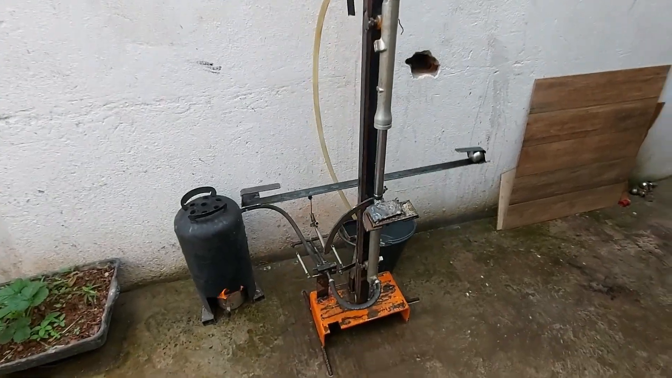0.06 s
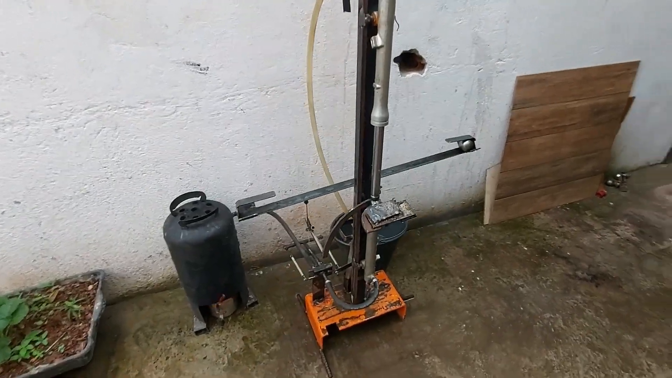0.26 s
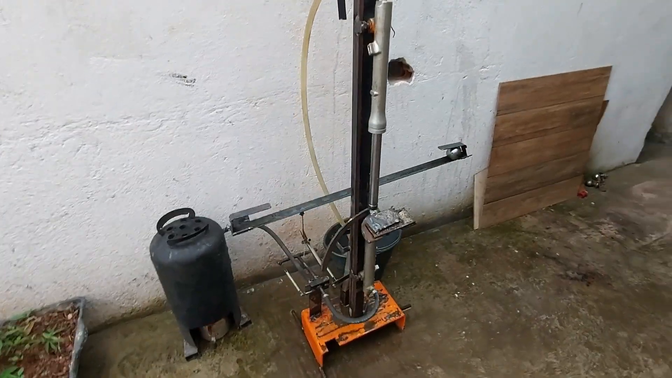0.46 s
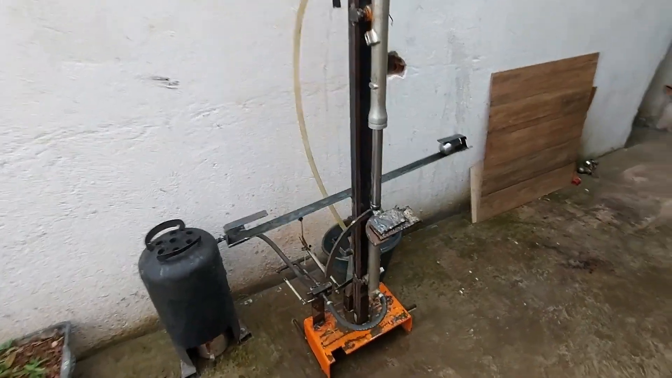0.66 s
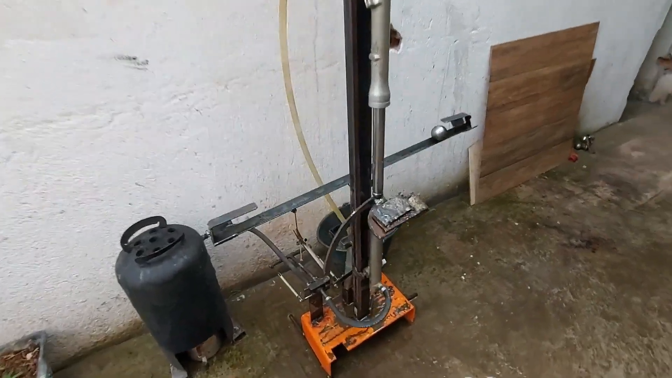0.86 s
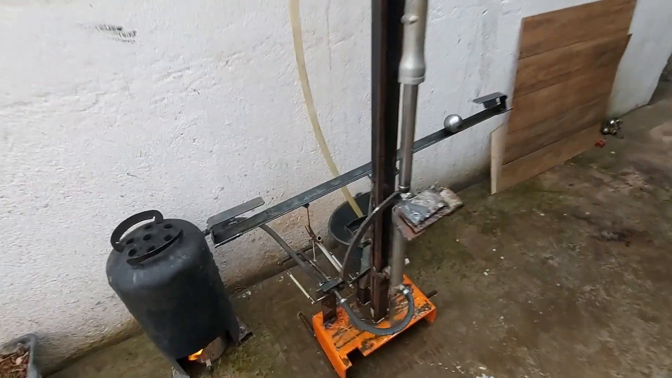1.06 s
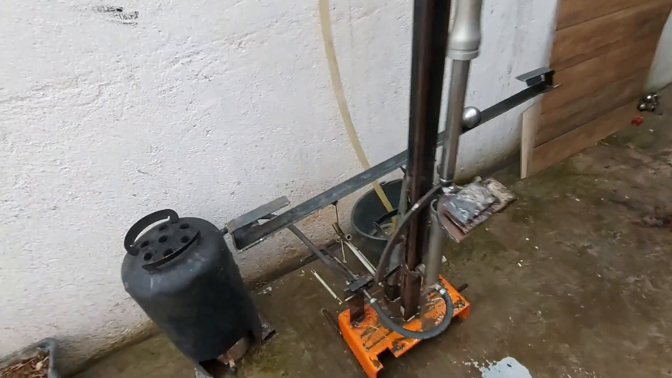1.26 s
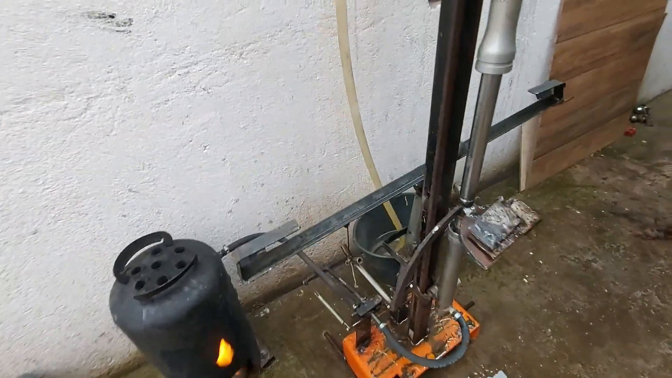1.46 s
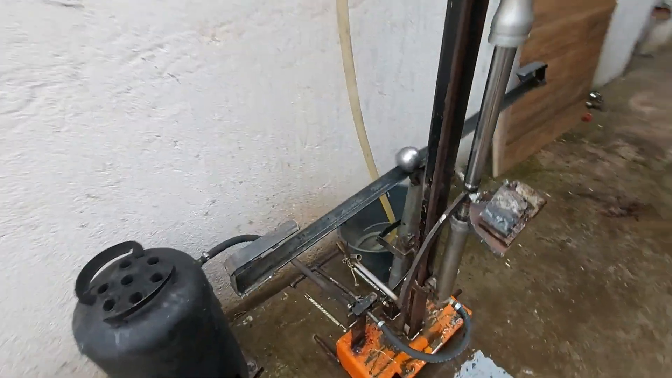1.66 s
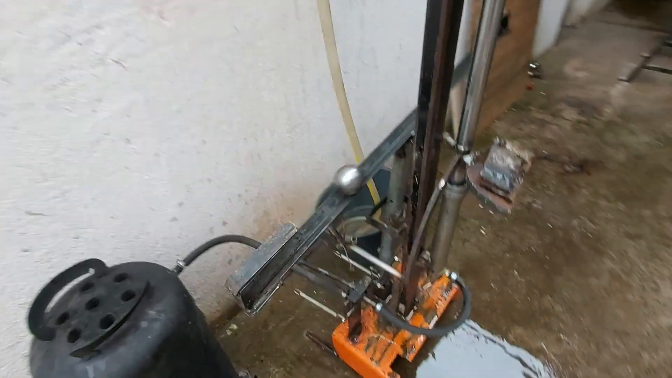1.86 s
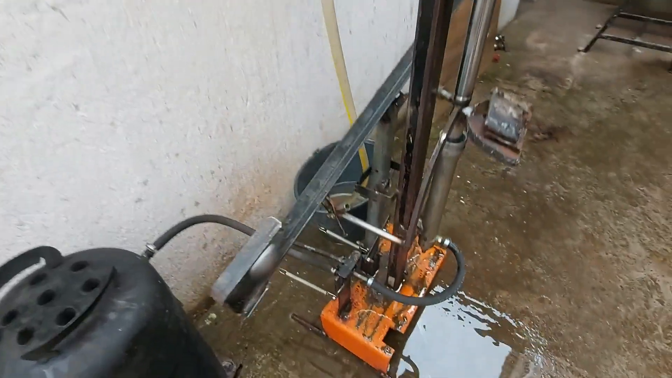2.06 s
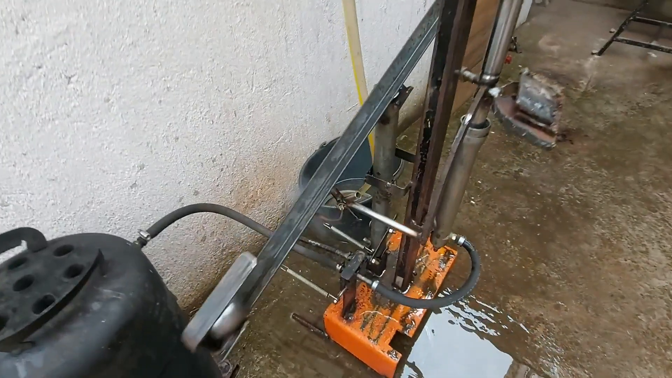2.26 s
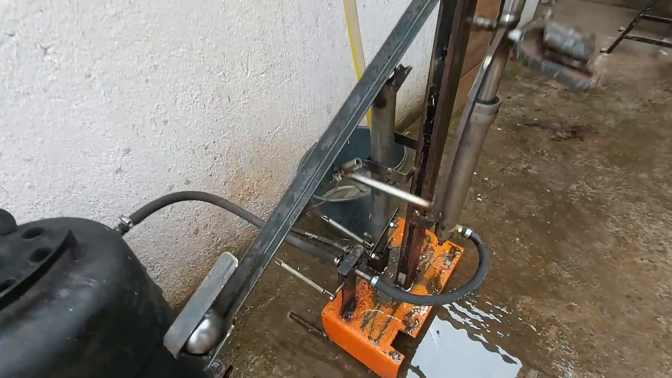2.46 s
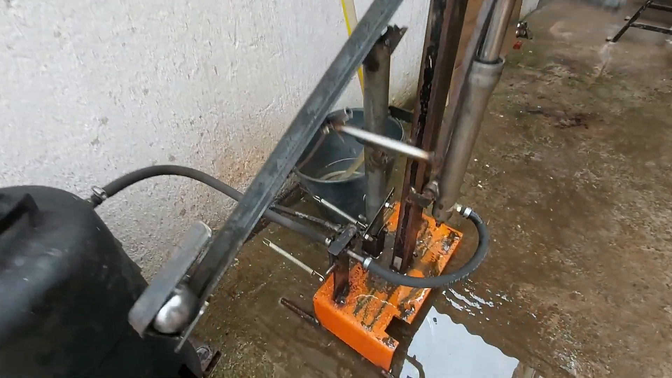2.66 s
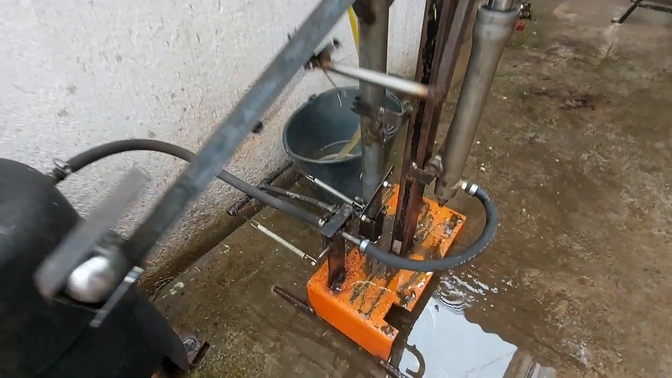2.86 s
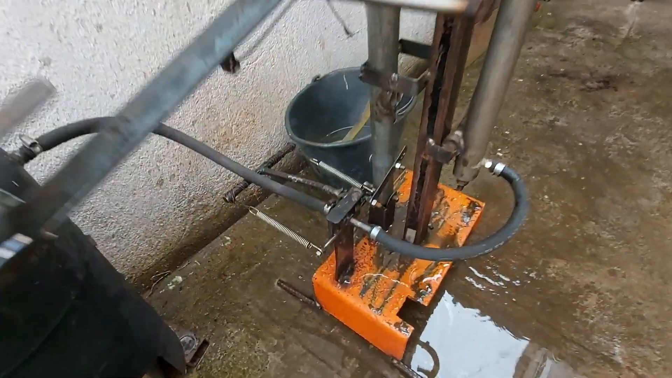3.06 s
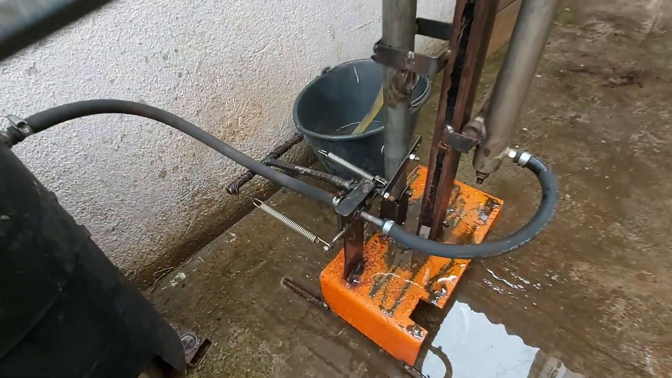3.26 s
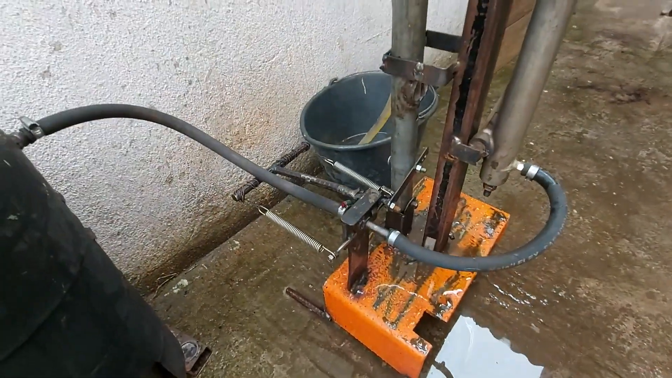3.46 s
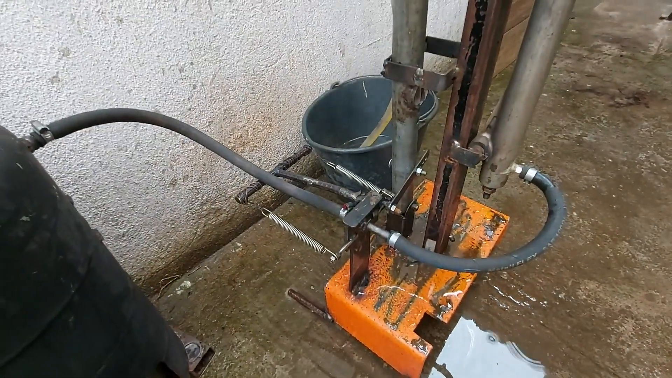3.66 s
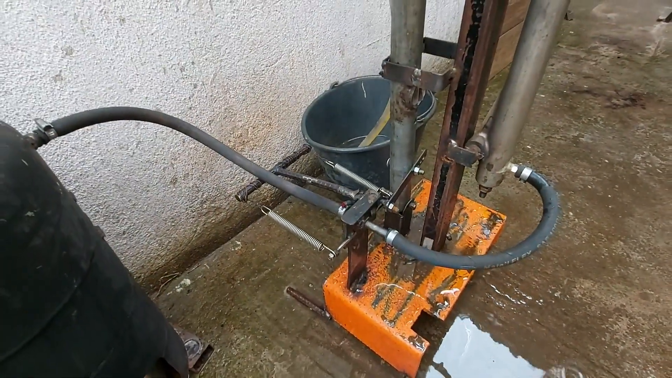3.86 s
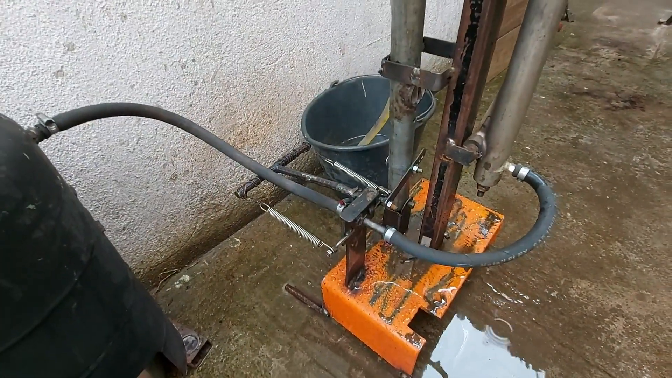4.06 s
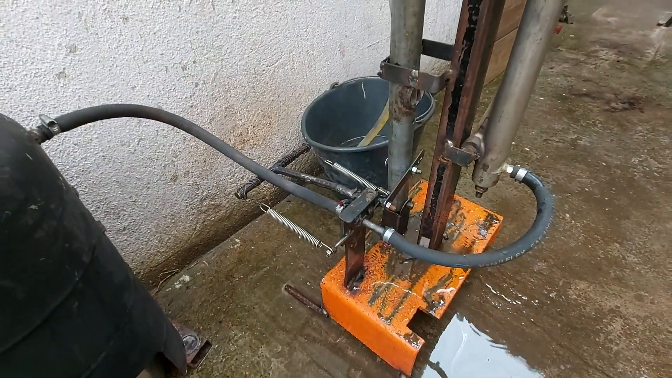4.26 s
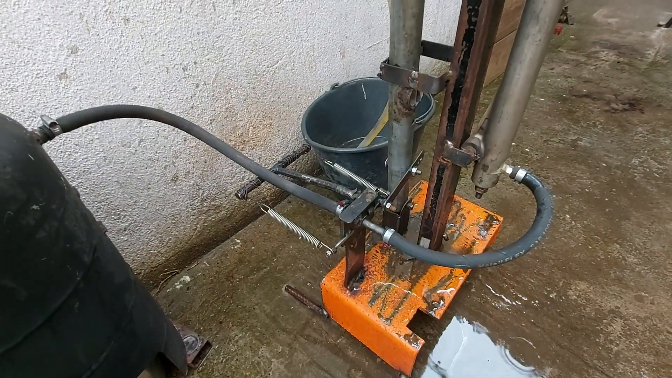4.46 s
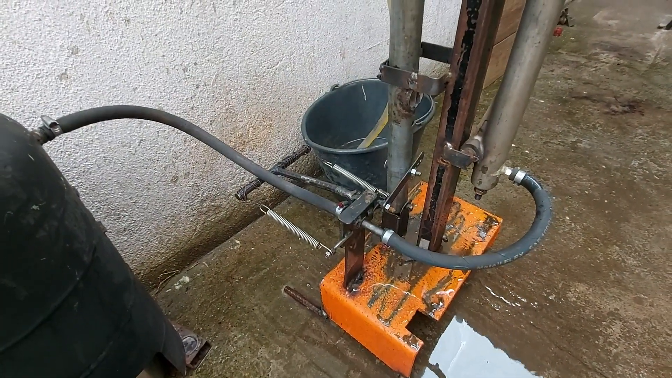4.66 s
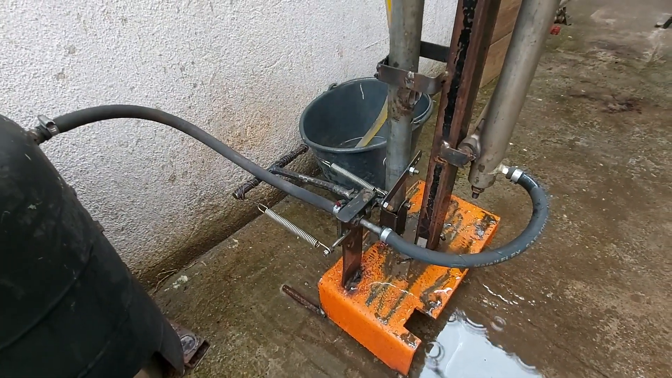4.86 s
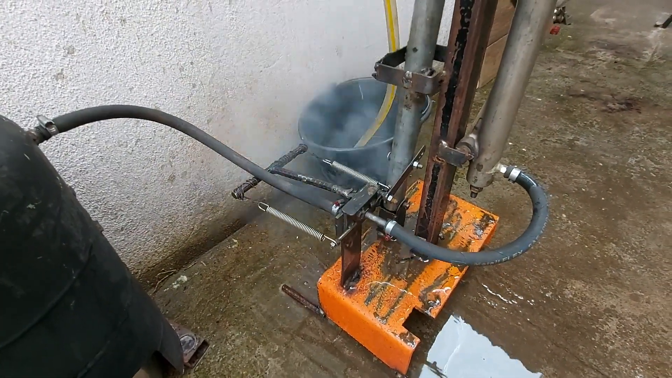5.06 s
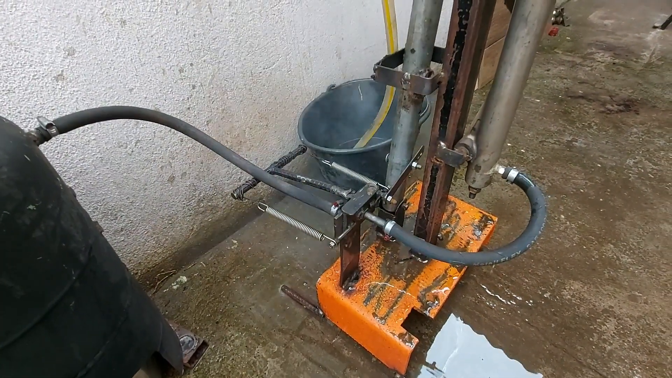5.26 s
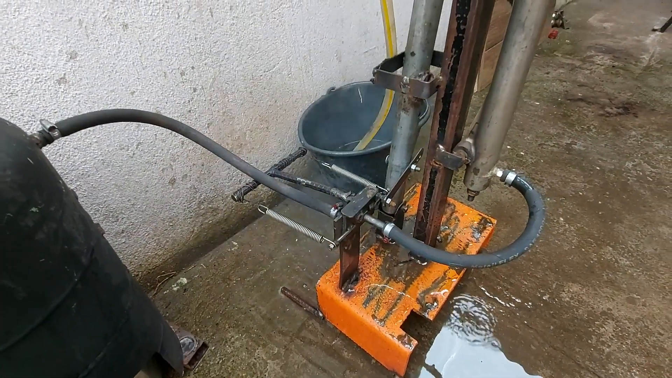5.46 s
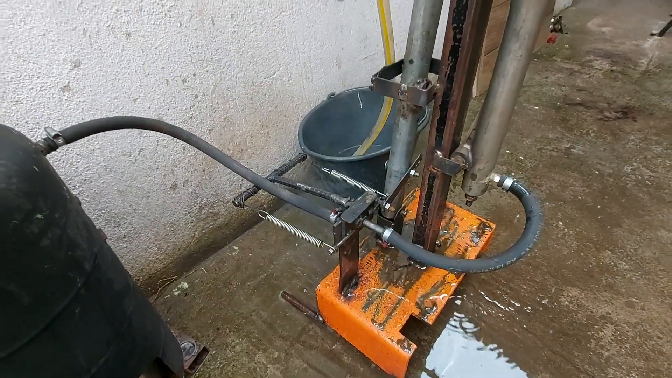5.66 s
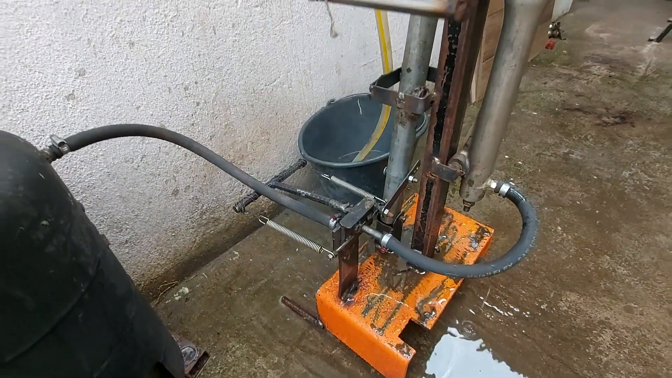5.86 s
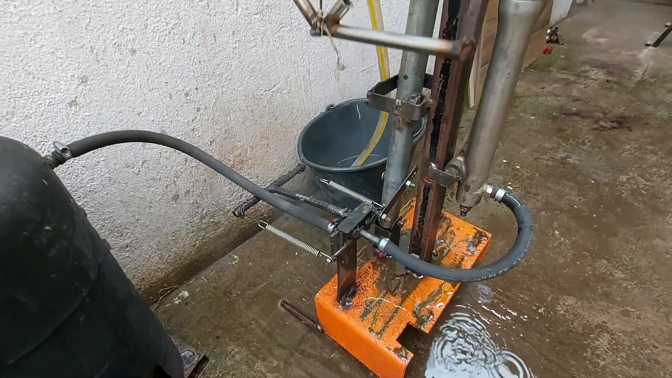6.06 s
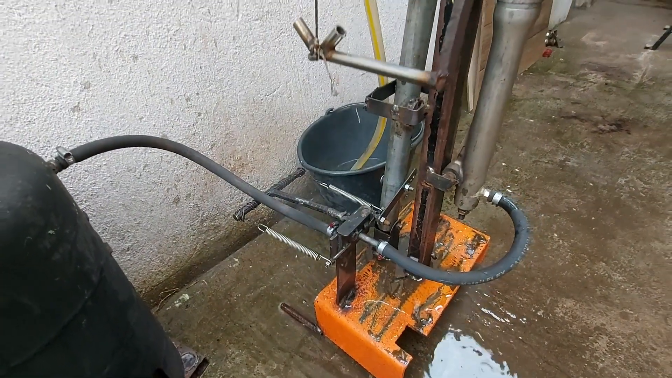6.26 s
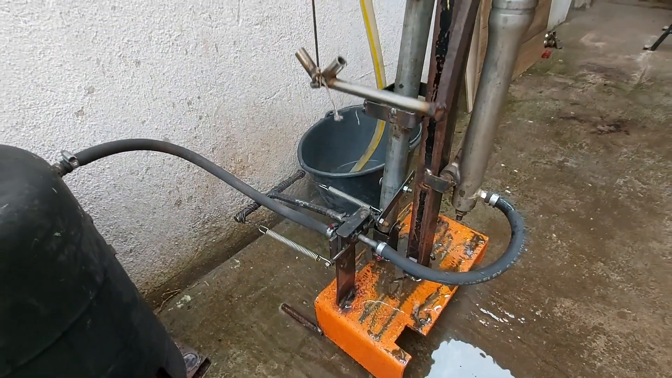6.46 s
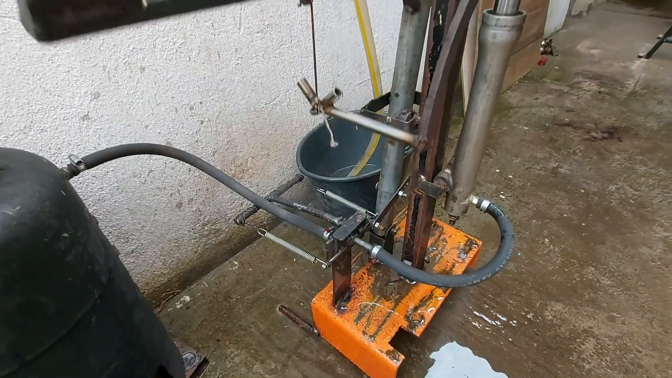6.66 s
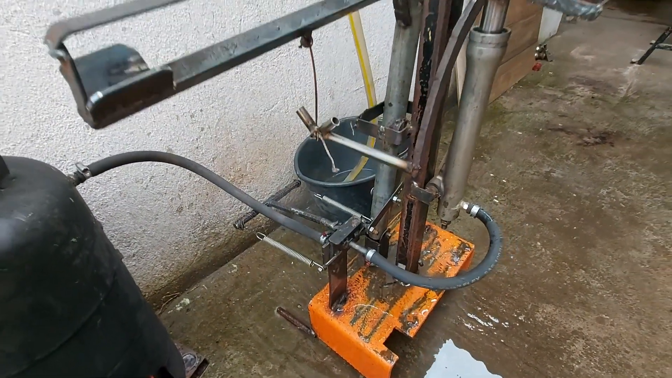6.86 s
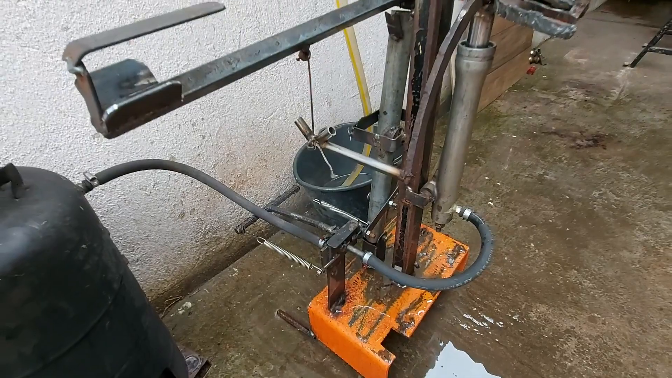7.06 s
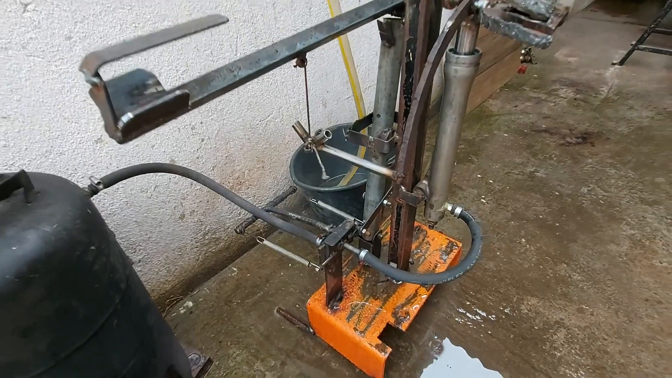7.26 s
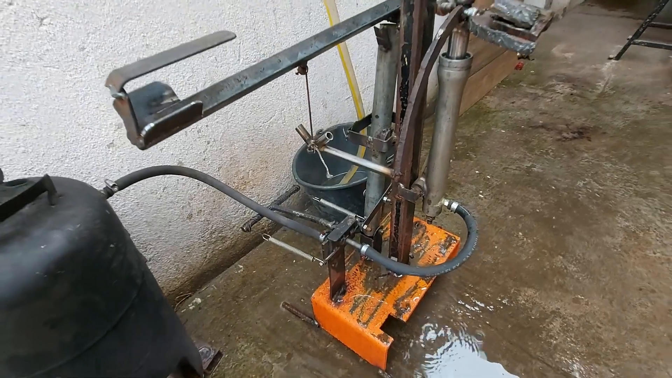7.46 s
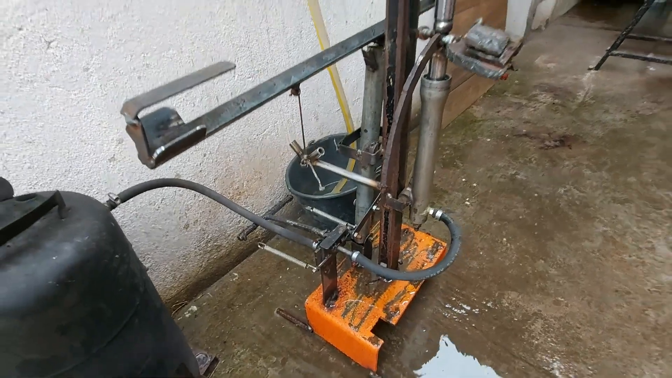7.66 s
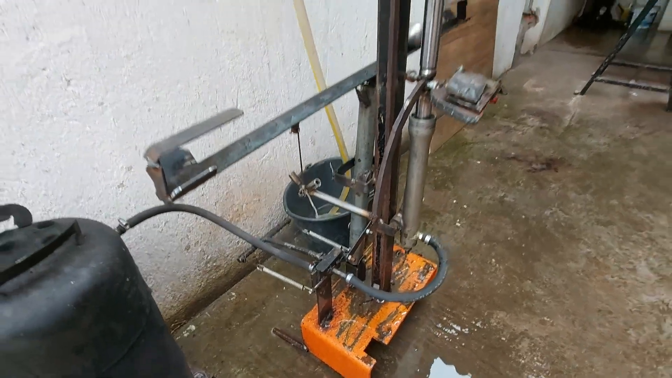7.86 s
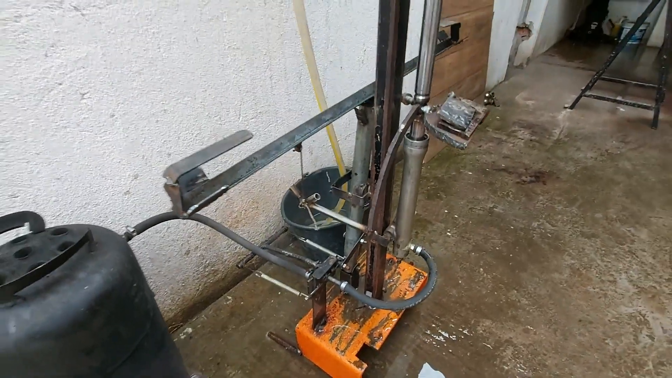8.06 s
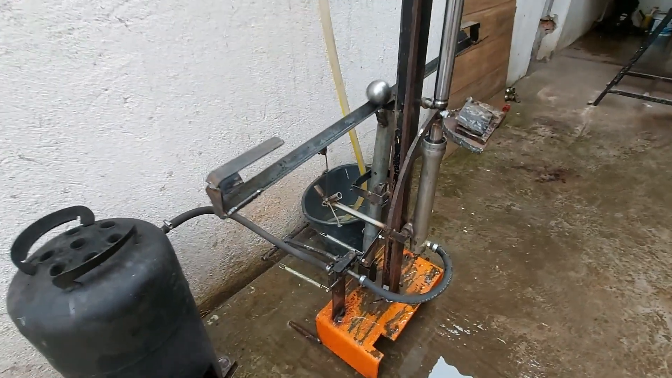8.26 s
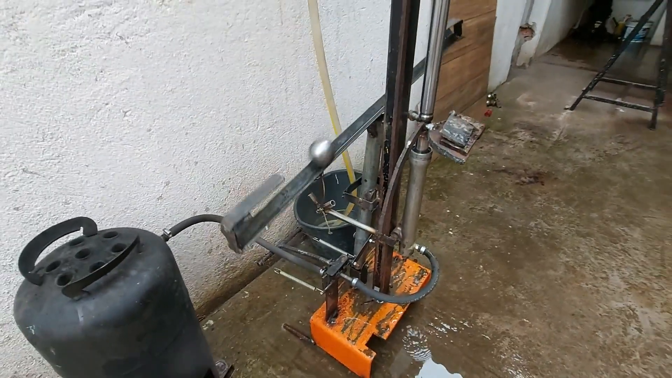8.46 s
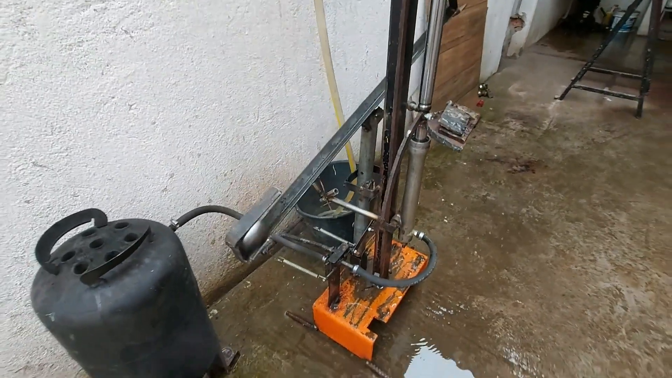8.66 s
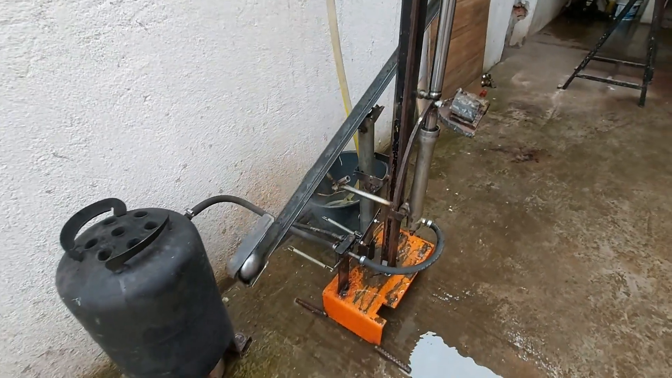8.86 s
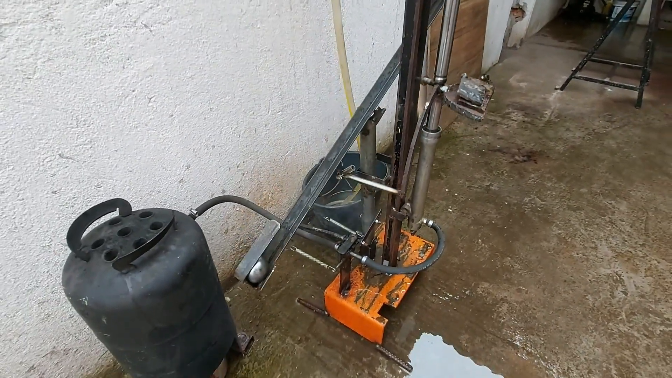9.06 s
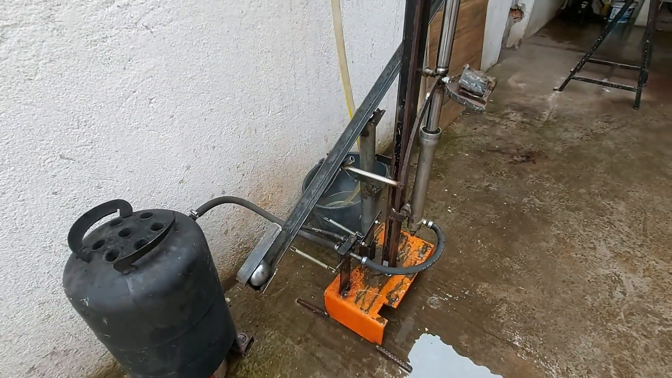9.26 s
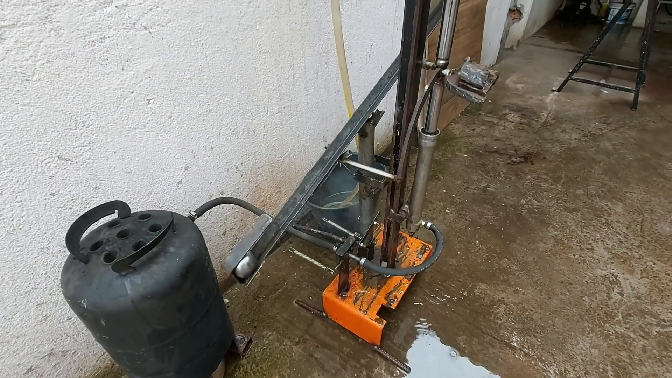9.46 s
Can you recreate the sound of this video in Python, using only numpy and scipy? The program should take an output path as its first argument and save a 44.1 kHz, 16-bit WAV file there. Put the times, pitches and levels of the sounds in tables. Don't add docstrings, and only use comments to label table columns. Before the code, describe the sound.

A steel ball rolls down a steel rail three times, knocking over joints and slamming a stop as steam hisses in bursts in a walled yard.

```python
import sys
import numpy as np
from scipy import signal
from scipy.fft import rfft, irfft, next_fast_len
from scipy.io import wavfile
from scipy.ndimage import uniform_filter1d

SR = 44100
rng = np.random.default_rng(int(sys.argv[2]) if len(sys.argv) > 2 else 0)


def elevation(decibels):
    levels = np.asarray(decibels, float)
    return 10 ** (levels / 20)


def generate_wav(signal):
    frames = np.transpose(np.atleast_2d(signal))
    scaled = np.clip(frames, -1, 1) * 32767
    pcm = np.round(scaled).astype(np.int16)
    wavfile.write(sys.argv[1], SR, pcm)


N = 419391
STEPS = np.arange(0, N + 32, 32) / SR

# frequency in Hz, density in dB per Hz.
YARD_AIR = [(85, 1), (417, -20.5), (1170, -21.5), (1930, -11.5), (4200, -14), (8450, -16.5), (9710, -14.5),
            (15600, -16.5)]
# time in seconds, level in dB, engine note in Hz.
TRAFFIC = [(0, -79.5, 90), (.7, -72.5, 94.6), (1.3, -62.5, 101.4), (2.6, -75, 101.2), (3.1, -74, 101),
           (3.35, -77, 100), (3.6, -73, 52), (4.3, -65.5, 52.4), (5.5, -81.5, 59.8), (6.2, -93, 61.7),
           (6.6, -80.5, 62.3), (7.5, -68.5, 59.7), (7.75, -60, 59.9), (9.51, -69.5, 58)]
# start in seconds, length in seconds, start in Hz, end in Hz, level in dB.
CHIRPS = [
    (5.864, .14, 4300, 3900, -71.5),
    (6.432, 0.096, 4800, 3730, -68),
    (6.511, 0.055, 3470, 4250, -66),
    (6.651, .12, 4710, 4970, -74),
    (7.178, 0.051, 4800, 4500, -56),
    (7.207, 0.065, 5100, 4600, -58),
    (7.255, 0.071, 4300, 3900, -56),
    (7.3, 0.088, 4000, 3700, -60),
]

# frequency in Hz, likeness from 0 to 1.
PORT_LIKENESS = [(60, 1), (180, 0.84), (550, 1), (1650, 0.14), (4970, 0.02), (15000, 0.018)]
# frequency in Hz, gain in dB.
PORT_COLOUR = [(6500, -0.5), (8100, -2), (8900, 2), (13000, 2.5), (15600, 1.5)]
# frequency in Hz, t60 in seconds.
WALL_T60 = [(200, 0.66), (1500, 0.87), (5000, 0.46), (14000, 0.19)]

# frequency in Hz, density in dB per Hz.
HISS = [(1760, -40.5), (3000, -3.5), (3640, -2.5), (4630, -2), (8100, -6.5), (9960, -4.5), (14600, -11.5),
        (15600, -15.5)]
# time in seconds, level in dB.
LEAK = [(0, -92), (.247, -88), (.29, -58), (.95, -67.5), (1.1, -78), (1.79, -68), (2.8, -68), (3.35, -65.5),
        (3.76, -55.5), (4.3, -46.5), (4.42, -52), (5.62, -87), (6.28, -85), (6.33, -73.5), (6.84, -65.5),
        (8.02, -76), (9.29, -70), (9.51, -60)]
# start in seconds, stop in seconds, first level in dB, last level in dB.
VENTS = [
    (2.185, 2.256, -27.5, -25),
    (6.888, 6.93, -45, -35.5),
    (8.426, 8.626, -40, -50),
    (8.737, 8.925, -25, -33.5),
    (8.958, 9.188, -27, -39),
]
# peak in seconds, level in dB, rise and fall in seconds per 20 dB.
JETS = [(1.04, -51, 0.015, 0.026), (1.81, -31.5, 0.013, .031), (1.93, -32, 0.014, 0.037),
        (2.09, -32, 0.11, 0.05), (2.168, -23.5, .012, .018), (2.52, -34, .05, 0.22),
        (5.26, -33, 0.069, 0.15), (1.32, -40, .015, 0.042), (1.392, -39, .012, 0.055),
        (1.64, -40.5, .04, 0.035), (1.718, -38.5, .025, 0.028), (1.765, -41, .015, .02),
        (4.465, -32, .03, 0.046), (2.28, -29.5, .02, 0.3), (2.43, -26, 0.028, 0.15),
        (3.2, -55.5, .04, 0.26), (4.328, -34, 0.046, 0.087), (4.538, -23.5, 0.071, 0.036),
        (4.692, -28.5, 0.24, 0.17), (4.892, -22.5, 0.048, 0.046), (5.024, -23.5, 0.1, 0.13),
        (5.164, -23, 0.094, 0.14), (6.85, -39, .003, .05), (7.42, -53.5, 0.11, 0.36),
        (7.85, -37, .005, 0.095), (8.42, -38, 0.22, 0.041), (8.635, -22, .008, 0.061)]
# start in seconds, length in seconds, level in dB.
SPITS = [(0.525, 0.06, -57), (.655, 0.083, -57), (0.785, 0.056, -55), (0.907, 0.046, -55.5),
         (2.914, 0.063, -56), (6.988, 0.078, -52.5), (7.116, 0.07, -51.5), (7.225, 0.12, -52.5),
         (7.412, 0.027, -47.5), (7.506, 0.067, -52.5), (7.606, 0.087, -54), (7.728, .08, -56.5),
         (7.942, 0.051, -42), (8.07, 0.021, -54), (4.633, 0.1, -46)]

# frequency in Hz, density in dB per Hz.
GRIND = [(71, -38.5), (120, -16), (340, -8), (1910, 2), (4240, -2.5), (8300, -11.5), (10600, -11.5),
         (15600, -25.5)]
# start in seconds, stop in seconds,
# first level in dB, last level in dB, bend of the rise (below 1 speeds up early).
RUNS = [
    (0.84, 2.264, -65.5, -35, 0.34),
    (2.392, 2.468, -41, -39, 1.01),
    (2.84, 3.15, -66, -70, 0.74),
    (3.793, 3.837, -42.5, -45, 1.01),
    (3.93, 5.248, -60, -35.5, 0.36),
    (7.053, 7.45, -65.5, -61, 1.1),
    (7.558, 8.842, -56, -36, 1.25),
    (9.295, 9.51, -69, -73, 0.95),
]
# peak in seconds, level in dB, rise and fall in seconds per 20 dB.
RATTLES = [(.31, -42, 0.047, 0.21), (.78, -58, 0.037, 0.077), (1.39, -42, 0.21, 1),
           (2.8, -59, 0.035, 0.066), (3.96, -39, 0.052, 0.049), (4.34, -37.5, 0.18, 0.066),
           (4.535, -35, .09, 0.073), (4.629, -33.5, 0.084, 0.44), (4.77, -35.5, 0.063, 0.088),
           (6.9, -41, 0.019, 0.16), (8.245, -37, 0.13, 0.055), (7.5, -39.5, 0.033, 0.065),
           (7.87, -42, 0.073, 0.97), (8.45, -38, 0.34, 0.17), (8.65, -50, 0.085, 0.037),
           (9.03, -35, 0.12, 0.15)]
# start in seconds, peak in dB, t60 in seconds.
BLOWS = [
    (.249, -31.5, 0.29),
    (.774, -44, 0.89),
    (2.053, -18, 0.14),
    (2.184, -14, .11),
    (3.782, -24.5, 0.043),
    (4.963, -12.5, 0.053),
    (6.848, -25, 0.23),
]
# start in seconds, peak in dB, t60 in seconds.
CLINKS = [(1.761, -41, .14), (1.908, -29, .14), (2.158, -16, 0.052), (2.382, -14.5, 0.58),
          (3.957, -24, 0.051), (4.871, -22, 0.16), (5.123, -17, 0.18), (6.8885, -18, 0.32),
          (8.422, -22, 0.14), (8.7325, -11, 0.041), (8.9545, -16, 0.68), (9.029, -14, 0.055)]
# start in seconds, peak in dB, t60 in seconds.
TAPS = [
    (.288, -25, 0.29),
    (2.665, -30.5, 0.05),
    (2.795, -26.5, 0.095),
    (3.829, -22.5, 0.25),
    (9.361, -29.5, 0.078),
]
# start in seconds, peak in dB.
JOINTS = [(0.924, -35.5), (1.032, -27), (1.161, -31), (1.198, -25), (1.313, -26), (1.39, -27), (1.625, -22),
          (1.713, -27), (1.801, -26.5), (5.534, -43.5), (5.66, -42.5), (7.471, -36.5), (7.639, -35),
          (7.849, -29.5), (8.119, -26), (8.346, -22), (8.632, -17)]
# start in seconds, peak in dB.
THUDS = [
    (0.252, -48),
    (2.056, -31),
    (3.782, -44.5),
    (6.848, -42),
    (8.633, -23.5),
]

STROKE_ENDS = (3.75, 6.8)
RAIL_HZ = [301, 937, 1790, 1900, 2955, 3408, 3562, 3930, 4354, 4506, 4932, 5626, 6066, 9195]
RAIL_T60 = [.1, .08, .06, .08, .08, .09, .09, .08, .1, .13, .12, .15, .14, .12]
# level in dB in strokes 1, 2 and 3.
RAIL_LEVELS = [(-0.5, -25, -6.5), (-15, -11, -12.5), (-6.5, -11, -2), (1.5, -3.5, -2), (-14, -12, -2.5),
               (-7.5, -5.5, 0), (-4, -0.5, 5), (-3, -2.5, 0.5), (0.5, -6, -5), (0, 0, -14), (0, 1, -3),
               (-14, 6.5, -4), (-4, -16, -7), (3, -5, 5)]
TOP_HZ = [3820, 5970, 6470, 7030, 8660, 9490, 9800, 9994, 10380, 11300, 11965, 12400, 12700, 14200]
# level in dB in strokes 1, 2 and 3.
TOP_LEVELS = [(-8.5, -8, -4.5), (-9, -2, -6), (-9.5, -10.5, -7), (-8.5, -5, -8), (-5, -9, -9),
              (-2.5, -3.5, -7), (-5, -9, -11), (-5, -2.5, -1.5), (-7, -5, -5), (-11, -4.5, -6),
              (-7, -8, -7), (-9, -3.5, -11), (-7, -2, -10), (-6, -7, -7)]
# start in seconds, frequency in Hz,
# level in dB, t60 in seconds.
BELLS = [(.288, 1905, -37.5, .2), (.34, 1912, -37.5, .15), (2.55, 1745, -55, .5), (4.0, 1476, -58, 1.8),
         (4.53, 1476, -47, 1.8), (5.123, 1476, -43.5, 1.8), (9.031, 380, -53, 1.1), (6.89, 383, -60, 1.1),
         (7.86, 380, -62, 2.5), (5.537, 2165, -61, .4), (2.798, 1720, -58, .6),
         (0.251, 4150, -42.5, .08), (2.162, 9140, -28.5, 0.12), (2.797, 6640, -35.5, 0.1),
         (9.363, 6730, -42, 0.078), (6.892, 1908, -40, 0.33), (6.89, 3820, -36, 0.3),
         (6.889, 5960, -36, .3), (6.89, 3900, -40, .25), (6.3, 1480, -54, .2), (3.067, 2000, -55, .05),
         (2.225, 9490, -33, .2), (8.99, 5620, -33, .12), (6.891, 5626, -32.5, 0.27),
         (6.889, 2890, -36, 0.26), (8.424, 4800, -35.5, 0.16), (8.822, 5620, -29, 0.3),
         (9.03, 5400, -30.5, 0.35), (8.957, 5600, -33, .15), (8.98, 9195, -30, .12),
         (8.735, 9900, -31, .08), (2.158, 5630, -29.5, .1), (2.385, 5700, -34.5, .2),
         (2.385, 13000, -33, .2), (2.665, 6560, -45, .15)]

# frequency in Hz, density in dB per Hz.
BUFFET = [(20, -3), (86, 0.5), (206, -8.5), (280, -2), (1160, -16.5), (1500, -17), (1950, -22.5),
          (3300, -48.5)]
# start in seconds, length in seconds, first level in dB,
# last level in dB, left-right difference in dB.
PUFFS = [
    (2.176, 0.08, -35, -28.5, -2),
    (2.38, 0.044, -23.5, -41, -4),
    (2.421, 0.096, -27, -47, -2.5),
    (4.961, 0.095, -31.5, -23, 4.5),
    (5.123, 0.014, -34, -37, 19),
    (5.15, 0.034, -29.5, -33, 13),
    (8.757, 0.0785, -30.5, -27.5, -1.5),
    (8.956, 0.049, -47, -26, 4.5),
    (9.028, 0.016, -33, -30.5, 15),
]
# start in
# seconds, peak in dB, pitch in Hz.
DRIPS = [(3.067, -37.5, 9850), (3.1009, -40, 11000), (3.1103, -32.5, 4330), (3.134, -32.5, 9900),
         (3.1775, -33, 7200), (3.1979, -30.5, 10570), (3.2873, -38.5, 10200), (3.31, -34, 9650),
         (3.419, -39.5, 10300), (3.6192, -36, 9860), (3.669, -33.5, 7500), (3.6915, -39, 10400),
         (3.7854, -30, 3330), (4.0767, -28, 10600), (4.118, -25, 9900), (4.1675, -23.5, 9700),
         (4.1944, -30, 5300), (4.962, -13, 11700), (3.152, -44, 11500), (3.2125, -40, 10500),
         (3.2435, -40, 9800), (3.2505, -44, 9900), (4.4301, -36, 9500), (4.4546, -30, 9500),
         (4.6811, -22, 9500), (8.6016, -30, 9500), (8.4136, -29, 9500)]
# delay in seconds, gain in dB.
DRIP_ECHOES = [(.0028, -5.5), (.0095, -10), (.016, -12.5)]


def evened(x):
    return x / np.sqrt(np.mean(x ** 2) + 1e-20)


def read(points, hz):
    f, value = np.transpose(points)
    return np.interp(np.log(hz + 1), np.log(f + 1), value)


def trace(rows, column, rest):
    rows, t = np.array(rows), np.arange(N) / SR
    curve = np.interp(t, rows[:, 0], rows[:, column])
    return np.where((t >= rows[0, 0]) & (t <= rows[-1, 0]), curve, rest)


def add(mix, s, sound):
    part = mix[:, round(s * SR):][:, :sound.shape[1]]
    part += sound[:, :part.shape[1]]


def colour(x, points):
    size = next_fast_len(N)
    gain = elevation(read(points, np.fft.rfftfreq(size, 1 / SR)))
    return irfft(rfft(x, size) * gain, size)[:, :N]


def noise(points, patchy_db, alike=1.):
    frames, hz = N // 128 + 5, np.fft.rfftfreq(512, 1 / SR)
    a, b, c, d, patches = rng.standard_normal((frames, 257, 5)).T
    patches = uniform_filter1d(patches, size=6, axis=0)
    patches = evened(uniform_filter1d(patches, size=16, axis=1))
    same = np.clip(alike * read(PORT_LIKENESS, hz), -1, 1)[:, None]
    left = a + 1j * b
    right = same * left + np.sqrt(1 - same ** 2) * (c + 1j * d)
    z = np.array([left, right]) * elevation(patchy_db * patches)
    flat = signal.istft(z, nperseg=512, noverlap=384)[1][:, :N]
    return evened(colour(flat, points))


def resonate(x, hz, width):
    turn = np.exp(2j * np.pi * np.cumsum(hz) / SR)
    r = np.exp(-np.pi * width / SR)
    return 2 * (turn * signal.lfilter([1 - r], [1, -r], x / turn)).real


def panned(db):
    return elevation(np.array([[db / 2], [-db / 2]]))


def hump(s, db, rise, fall):
    t = STEPS - s
    return elevation(np.maximum(db - 20 * np.maximum(-t / rise, t / fall), -140))


def span(start, stop, first_db, last_db, bend, out_db_per_s):
    progress = np.clip((STEPS - start) / (stop - start), 0, 1)
    db = first_db + (last_db - first_db) * progress ** bend
    db = db - out_db_per_s * np.maximum(STEPS - stop, 0)
    return elevation(np.maximum(db, -140)) * np.clip((STEPS - start) / .004 + 1, 0, 1)


def joined(envelopes):
    return np.interp(np.arange(N) / SR, STEPS, np.sqrt(sum(e ** 2 for e in envelopes)))


def yard():
    engine_hz, level_db = trace(TRAFFIC, 2, rest=60.), trace(TRAFFIC, 1, rest=-120.)
    hum = evened(resonate(rng.standard_normal(N), engine_hz, width=6.))
    out = elevation(-68.5) * noise(YARD_AIR, patchy_db=.8) + hum * elevation(level_db)
    band = signal.butter(2, [260, 1300], "bandpass", fs=SR, output="sos")
    tyres = evened(signal.sosfilt(band, rng.standard_normal((2, N))))
    out += tyres * elevation(level_db - 4.5)
    for s, length, from_hz, to_hz, db in CHIRPS:
        hz = np.geomspace(from_hz, to_hz, round(length * SR))
        chirp = resonate(rng.standard_normal((2, len(hz))), hz, width=300.0)
        add(out, s, elevation(db) * evened(chirp) * np.hanning(len(hz)))
    return out


def valve():
    leak = elevation(np.interp(STEPS, *np.transpose(LEAK)))
    vents = [span(*row, bend=1, out_db_per_s=215) for row in VENTS]
    return joined([leak] + vents + [hump(*row) for row in JETS])


def steam():
    wet = rng.standard_normal(N)
    quick = evened(uniform_filter1d(wet, size=200))
    slow = evened(uniform_filter1d(wet[::-1], size=1100))
    hiss = noise(HISS, patchy_db=1.5) * elevation(1.4 * quick + 1.3 * slow)
    spits = np.zeros((1, N))
    for s, length, db in SPITS:
        add(spits, s, elevation(db) * signal.windows.tukey(round(1.17 * length * SR), .85)[None])
    thin = evened(np.diff(hiss, n=2, prepend=0, append=0))
    return hiss * valve() * elevation(-4.0) + thin * spits


def knocks():
    out = []
    for rows, tilt_db in [(BLOWS, -3.5), (CLINKS, 6), (TAPS, 3)]:
        out += [(s, db, tilt_db, t60, .00054) for s, db, t60 in rows]
    return out + [(s, db, 0, 0.22, .003) for s, db in JOINTS]


def rolling():
    runs = [span(*row, out_db_per_s=134.5) for row in RUNS]
    return joined(runs + [hump(*row) for row in RATTLES])


def contact():
    grit = elevation(0.5 * np.minimum(rng.exponential(1, N // 40 + 1), 4))
    grit = evened(grit).repeat(40)[:N]
    hops = elevation(3. * np.minimum(rng.exponential(1, N), 3)) * (rng.random(N) < 140. / SR)
    hops = evened(signal.lfilter([1], [1, -np.exp(-1 / (.004 * SR))], hops))
    out = noise(GRIND, patchy_db=0.5) * (grit + 0.84 * hops) * rolling() * elevation(-4.5)

    steel, t = noise(GRIND, patchy_db=3.5), np.arange(SR // 2) / SR
    octaves = np.log2((np.fft.rfftfreq(len(t), 1 / SR) + 200) / 4000)
    for s, db, tilt_db, t60, rise in knocks():
        burst = np.resize(steel[:, round(s * SR):].T, (len(t), 2)).T
        burst = evened(irfft(rfft(burst) * elevation(tilt_db * octaves), len(t)))
        fall = elevation(-60 * t / max(t60, .02)) + 0.5 * np.exp(-t / 0.0043)
        add(out, s, burst * fall * elevation(db - 11.0) * np.minimum(t / rise, 1))

    band = signal.butter(2, [220, 900], "bandpass", fs=SR, output="sos")
    for s, db in THUDS:
        thud = evened(signal.sosfilt(band, rng.standard_normal(len(t))))
        add(out, s, np.tile(thud * elevation(db - 9.5 - 60 * t / 0.043), (2, 1)))
    return out


def rail(force, modes_hz, t60s, levels):
    out = np.zeros((2, N))
    stroke = np.searchsorted(STROKE_ENDS, np.arange(N) / SR)
    luck = rng.random((len(levels), 4))
    for hz, t60, db, (speed, place, lean, turn) in zip(modes_hz, t60s, levels, luck):
        r, w = np.exp(-np.log(1000) / (t60 * SR)), 2 * np.pi * hz / SR
        loops = .08 + np.sin(2 * np.pi * ((.6 + 1.4 * speed) * STEPS + place)) ** 4
        drive = force[0] * loops.repeat(32)[:N] * elevation(np.array(db))[stroke]
        ring = signal.lfilter([np.sin(w)], [1, -2 * r * np.cos(w), r * r], drive)
        late = np.roll(ring, int(40 * turn))
        out += np.array([ring, late]) * panned(9.1 * lean - 4.)
    return elevation(-38.0) * out


def jangle(force, count=260, t60=0.078):
    hz = np.interp(np.arange(count) + rng.random(count), [0, count], [700., 15600])
    t = np.arange(SR // 6) / SR
    fall = elevation(-60 * t / (t60 * rng.uniform(0.46, 1.22, (count, 1))))
    waves = np.exp(2j * np.pi * hz[:, None] * t) * fall
    out = signal.sosfilt(signal.butter(2, 750, fs=SR, output="sos"), force)
    for k in range(6):
        share = np.cos(np.pi / 2 * np.clip((9. * np.arange(N) / SR - k) % 6 - 3, -1, 1))
        weights = elevation(5. * np.clip(rng.standard_normal(count), -2, 1.6))
        weights = weights * np.exp(2j * np.pi * rng.random((2, count)))
        body = (weights @ waves).real
        body = body / np.linalg.norm(body[0])
        out += signal.oaconvolve(force * share, body, axes=1)[:, :N]
    return out


def rings():
    out, t = np.zeros((2, N)), np.arange(3 * SR // 2) / SR
    struck = BELLS
    for (s, hz, db, t60), (phase, lag, beat) in zip(struck, rng.random((len(struck), 3))):
        turns = hz * t + phase + .25 * lag * np.array([[0], [1]])
        twin = .5 * np.exp(-t / .12) * np.sin(2 * np.pi * (turns + (12 + 25 * beat) * t))
        fall = elevation(db - 60 * t / t60) * np.minimum(t / 0.0027, 1)
        add(out, s, (np.sin(2 * np.pi * turns) + twin) * fall)
    return out


def wall(x):
    taps = np.zeros((2, SR))
    at = np.arange(400, SR - 20, 20) + rng.integers(0, 20, (2, (SR - 401) // 20))
    np.put_along_axis(taps, at, rng.choice([-1., 1.], at.shape), 1)
    hz, t, z = signal.stft(taps, SR, nperseg=256)
    fall = elevation(-60 * t / read(WALL_T60, hz)[:, None])
    tail = signal.istft(z * fall, SR, nperseg=256)[1]
    return signal.fftconvolve(x, tail / np.linalg.norm(tail[0]), axes=1)[:, :N]


def puffs():
    lumps = elevation(1.95 * evened(uniform_filter1d(rng.standard_normal((2, N)), size=400)))
    gust = noise(BUFFET, patchy_db=1.5, alike=0.) * evened(lumps)
    slow = signal.sosfilt(signal.butter(2, 190, fs=SR, output="sos"), gust)
    out = np.zeros((2, N))
    for s, length, first_db, last_db, pan_db in PUFFS:
        u, at = np.linspace(0, 1, round(length * SR)), round(s * SR)
        part = slice(at, at + len(u))
        blend = (1 - 0.53 * u) * gust[:, part] + 0.55 * u * slow[:, part]
        edges = np.minimum(u * length / 0.00064, 1) * np.minimum((1 - u) * length / 0.0037, 1)
        level = elevation(first_db + (last_db - first_db) * u)
        add(out, s, evened(blend) * edges * level * panned(pan_db))
    return out


def drips():
    out, t = np.zeros((2, N)), np.arange(1500) / SR
    band = signal.butter(2, [3500, 13500], "bandpass", fs=SR, output="sos")
    fall = np.exp(-t / .0005) + 0.1 * np.exp(-t / 0.014)
    for s, db, hz in DRIPS:
        snap = signal.sosfilt(band, rng.standard_normal((2, len(t))) * fall)
        ring = np.sin(2 * np.pi * hz * t) * np.exp(-t / 0.0013) * np.minimum(t / 0.00028, 1)
        drip = elevation(db - 1.5) * (0.93 * snap + 0.38 * ring) * panned(-4.5)
        for delay, echo_db in [(0.00088, 0.002)] + DRIP_ECHOES:
            add(out, s + delay, drip * elevation(echo_db))
    return out


def scene():
    force, jet = contact(), steam()
    steel = elevation(-4.0) * force + elevation(-3.5) * jangle(force + elevation(.5) * jet)
    steel = steel + rail(force, RAIL_HZ, RAIL_T60, RAIL_LEVELS) + rings() + drips()
    near = steel + elevation(-13.5) * wall(steel) + elevation(-4.) * jet + puffs() + yard()
    top_t60s = [.11] * len(TOP_LEVELS)
    top = rail(force + elevation(-0.5) * jet, TOP_HZ, top_t60s, TOP_LEVELS)
    return near + elevation(2.0) * top


def low_pass(x):
    return signal.sosfilt(signal.butter(12, 16990, fs=SR, output="sos"), x)


def record(dry):
    bass_cut = signal.butter(3, 52, "highpass", fs=SR, output="sos")
    heard = signal.sosfilt(bass_cut, colour(dry, PORT_COLOUR))
    heard = signal.oaconvolve(heard, signal.firwin(601, 15850, fs=SR)[None], "same")
    return low_pass(heard)


dry = scene()
out = record(dry)
generate_wav(out)
```